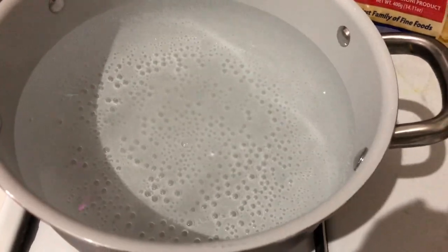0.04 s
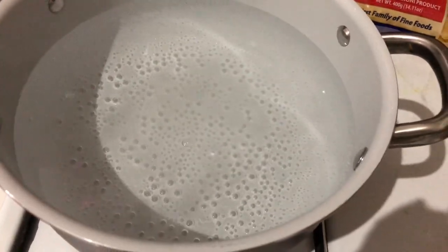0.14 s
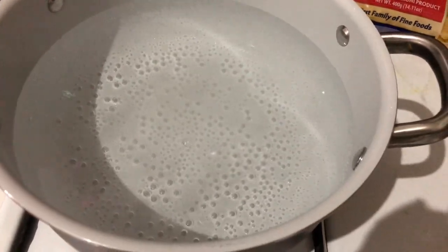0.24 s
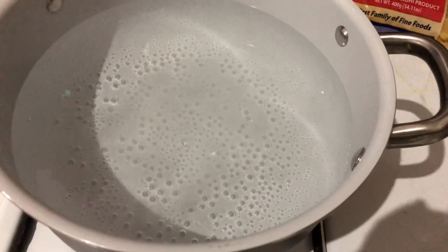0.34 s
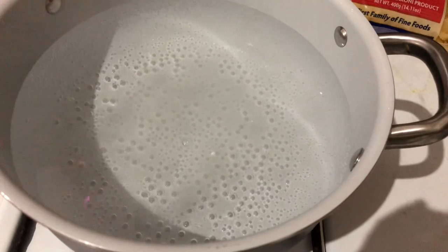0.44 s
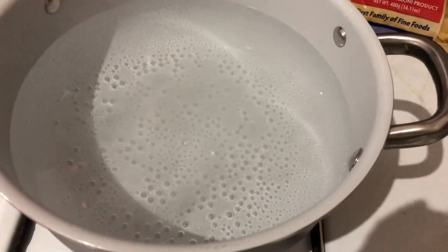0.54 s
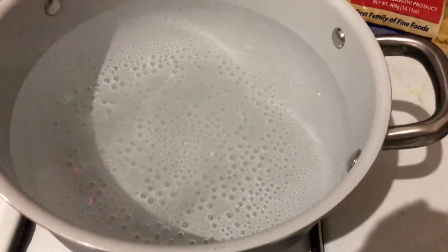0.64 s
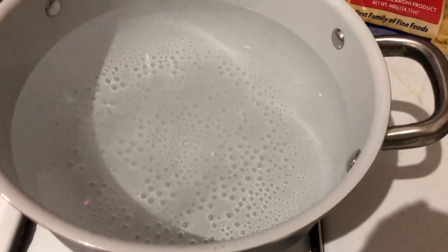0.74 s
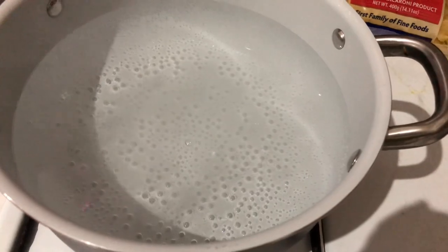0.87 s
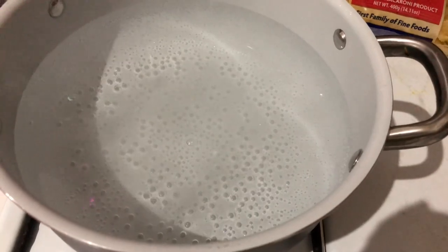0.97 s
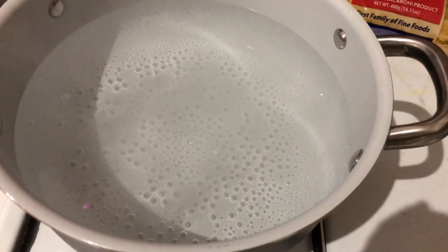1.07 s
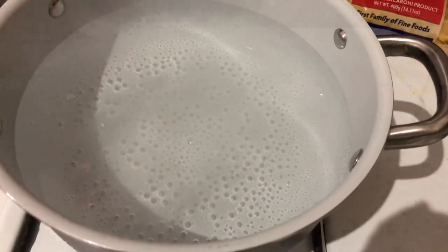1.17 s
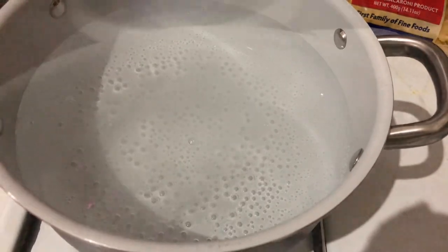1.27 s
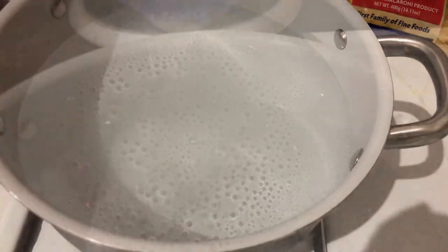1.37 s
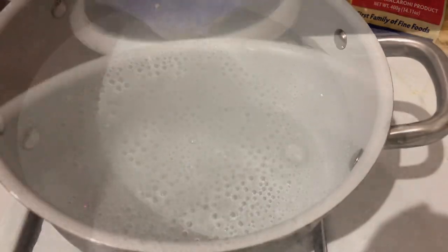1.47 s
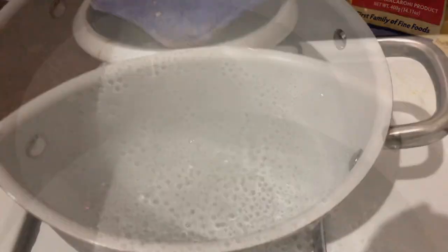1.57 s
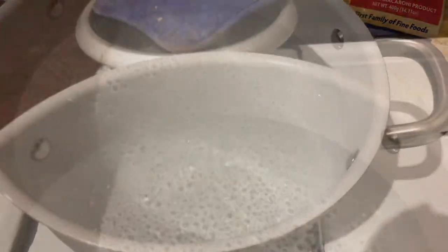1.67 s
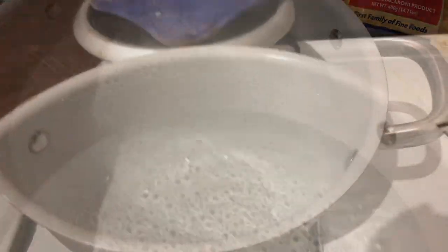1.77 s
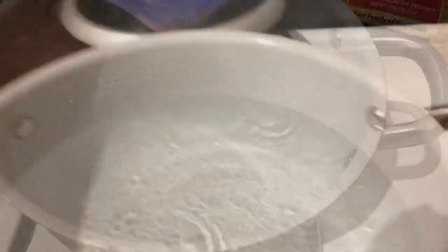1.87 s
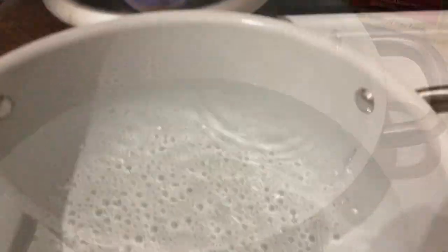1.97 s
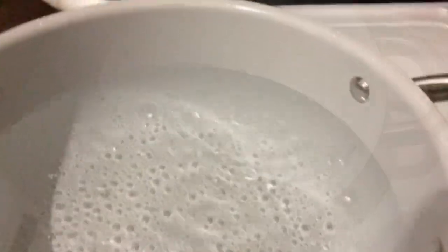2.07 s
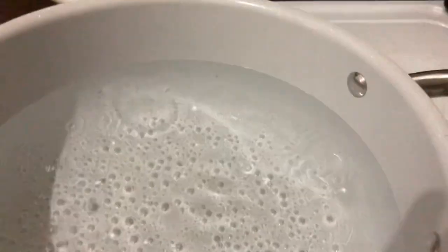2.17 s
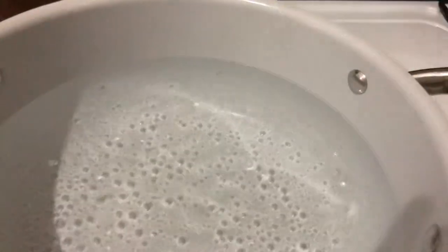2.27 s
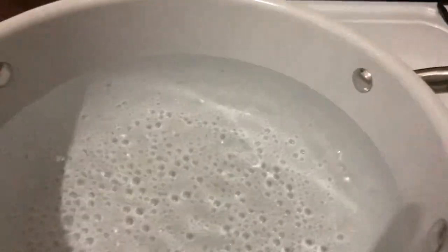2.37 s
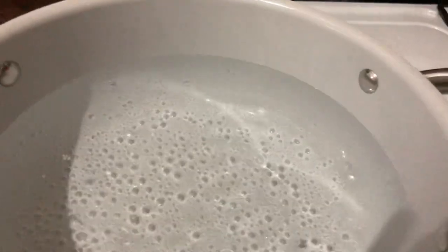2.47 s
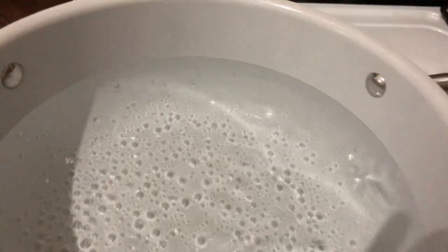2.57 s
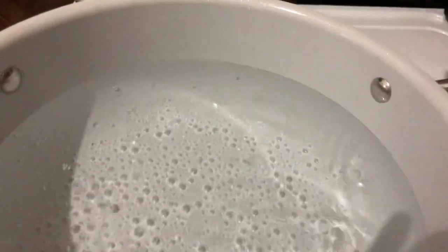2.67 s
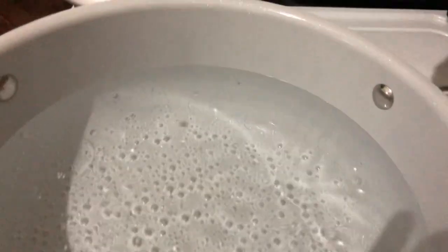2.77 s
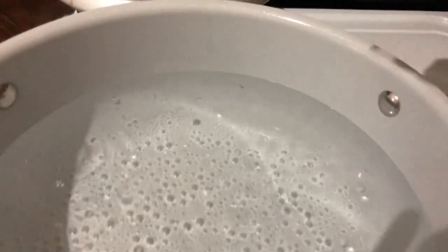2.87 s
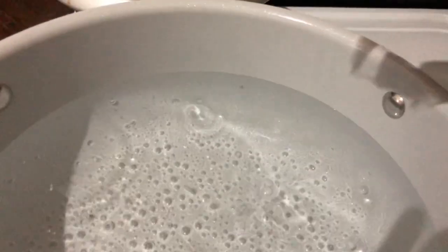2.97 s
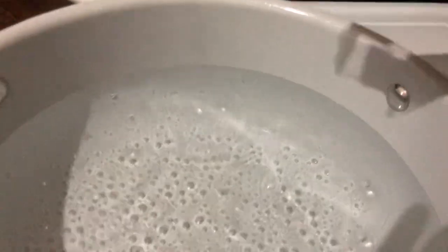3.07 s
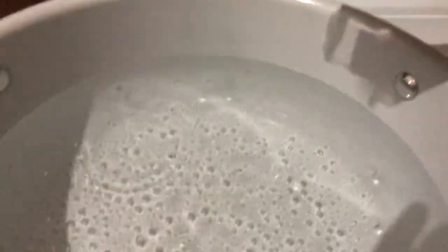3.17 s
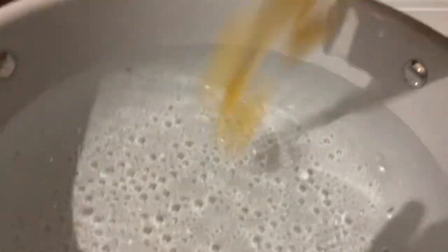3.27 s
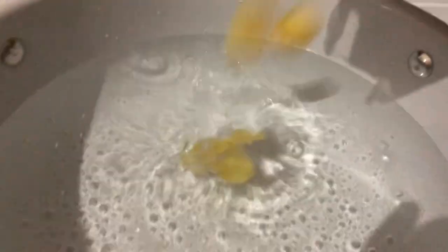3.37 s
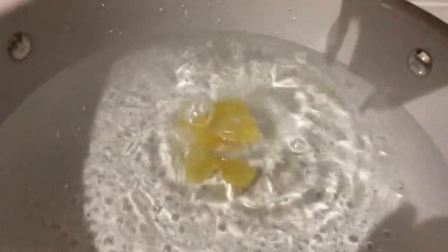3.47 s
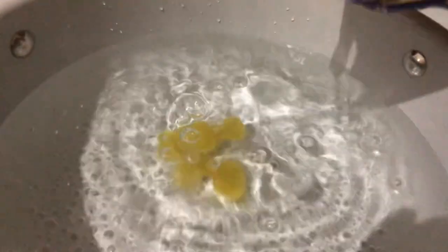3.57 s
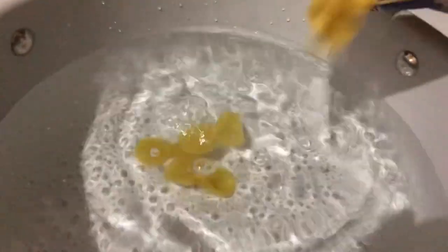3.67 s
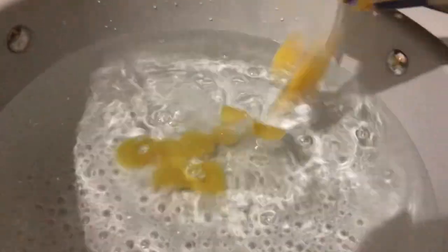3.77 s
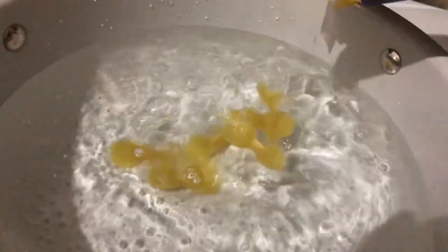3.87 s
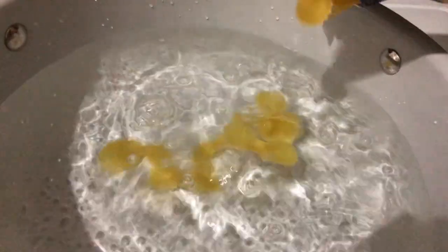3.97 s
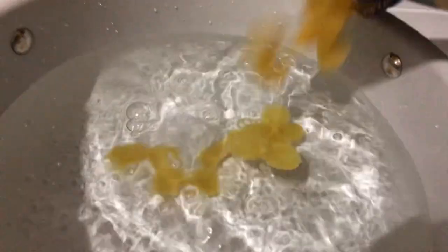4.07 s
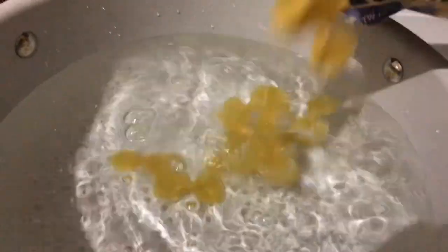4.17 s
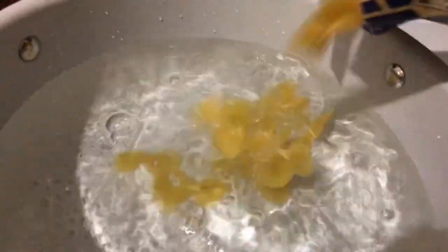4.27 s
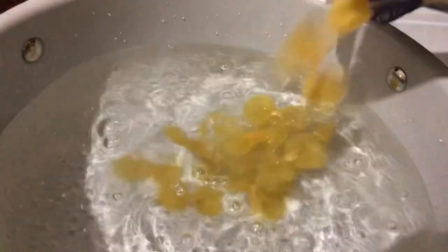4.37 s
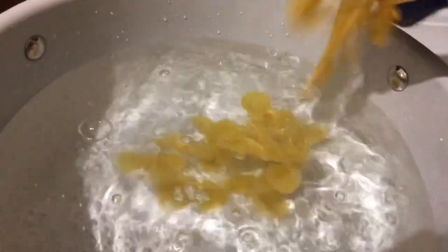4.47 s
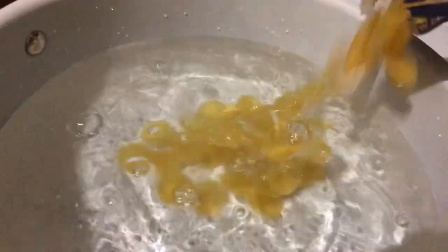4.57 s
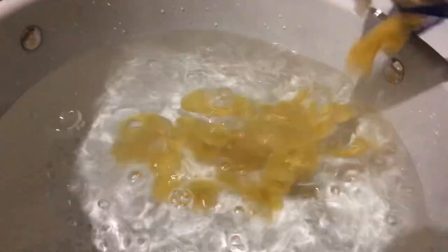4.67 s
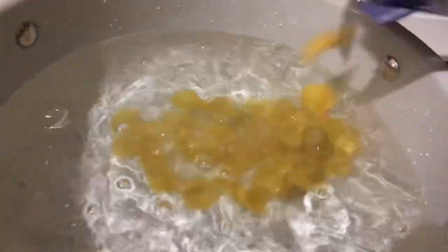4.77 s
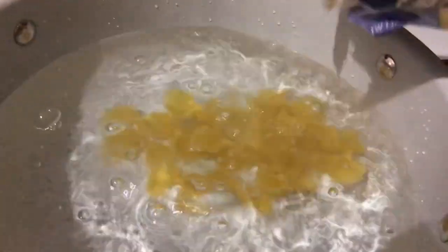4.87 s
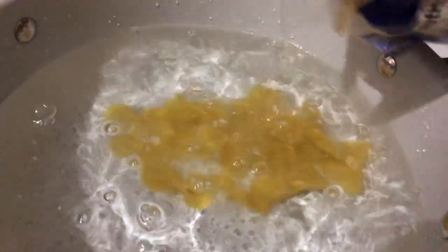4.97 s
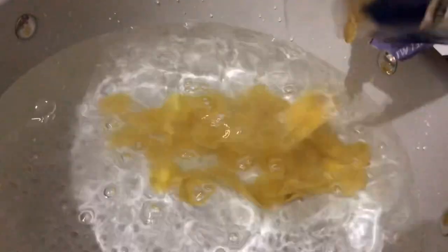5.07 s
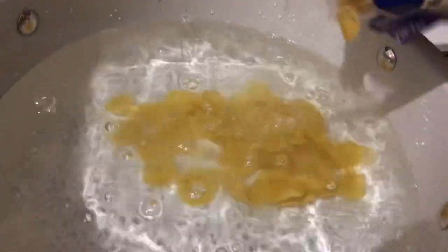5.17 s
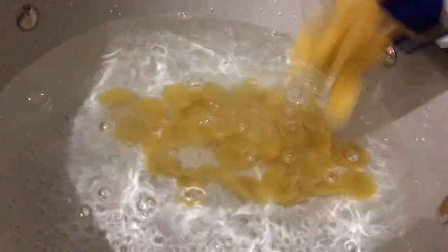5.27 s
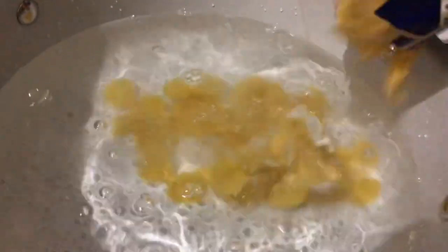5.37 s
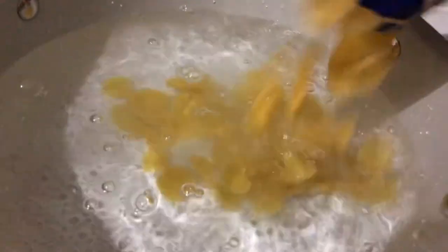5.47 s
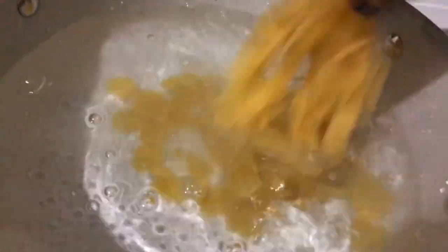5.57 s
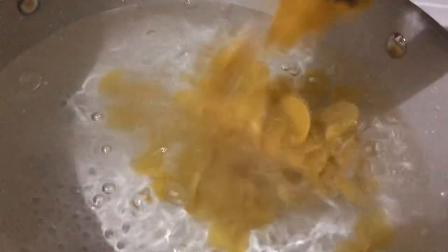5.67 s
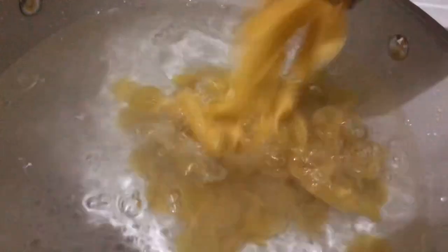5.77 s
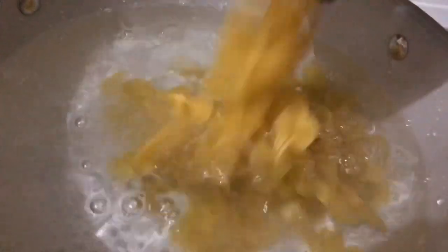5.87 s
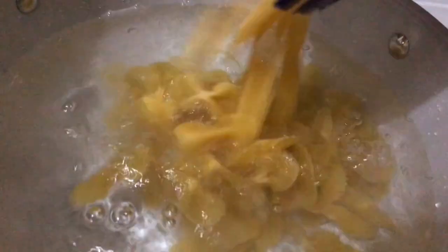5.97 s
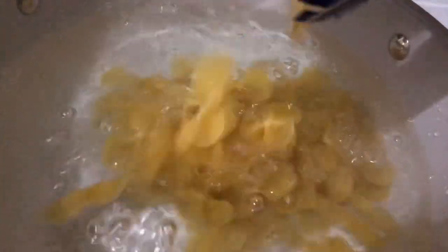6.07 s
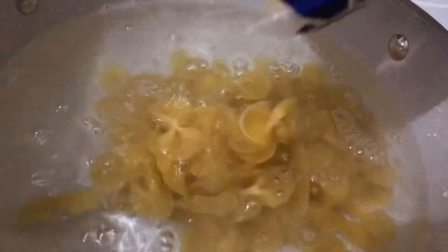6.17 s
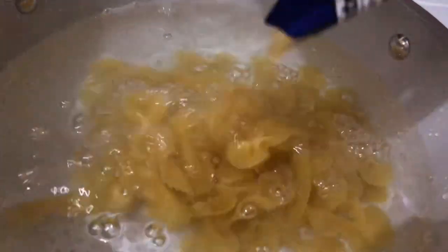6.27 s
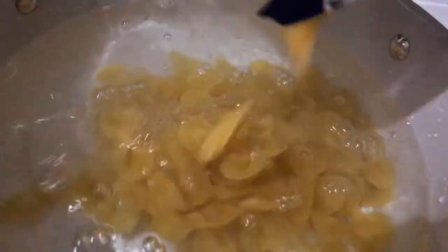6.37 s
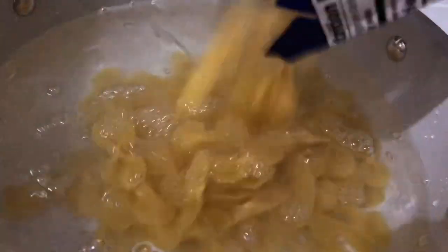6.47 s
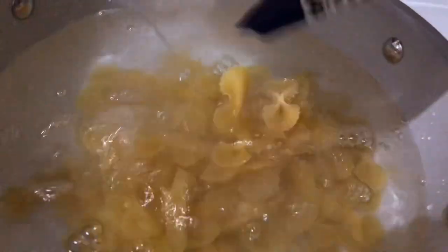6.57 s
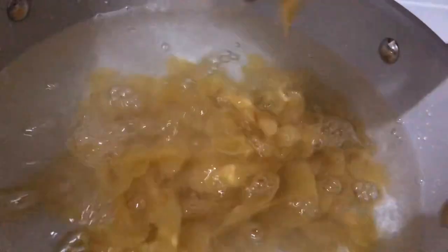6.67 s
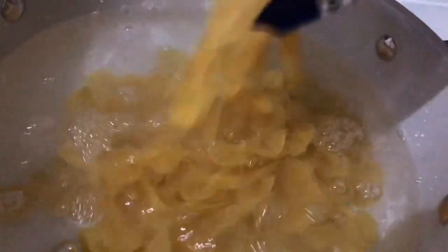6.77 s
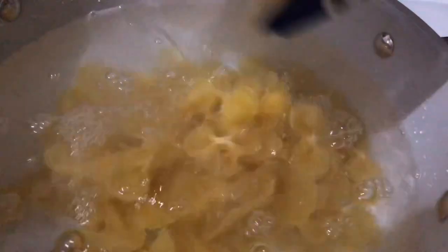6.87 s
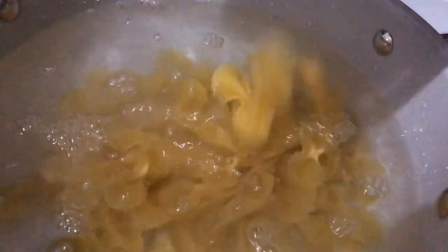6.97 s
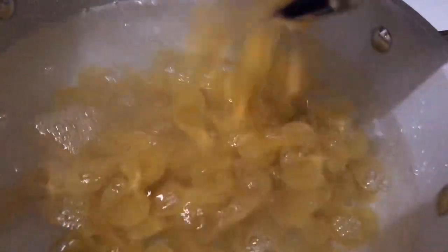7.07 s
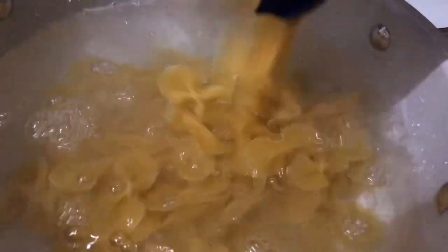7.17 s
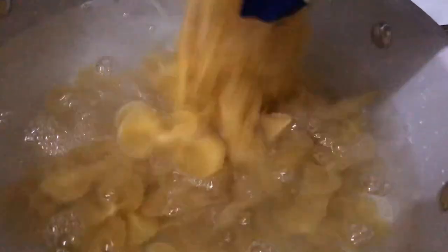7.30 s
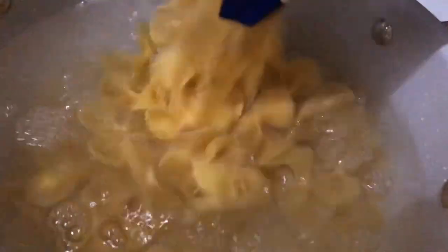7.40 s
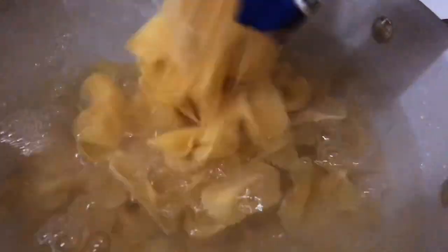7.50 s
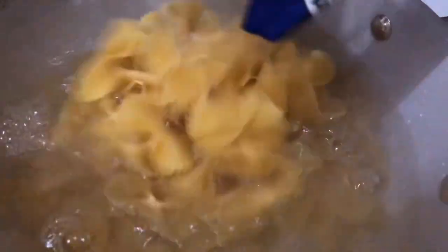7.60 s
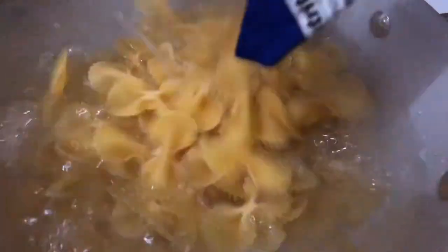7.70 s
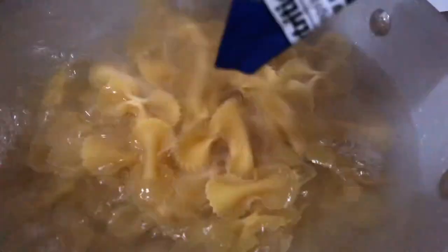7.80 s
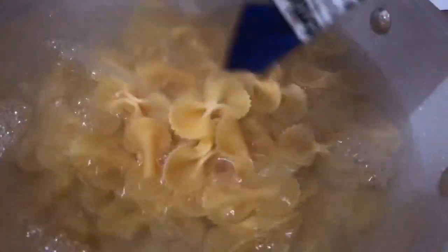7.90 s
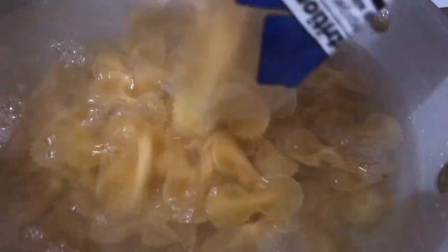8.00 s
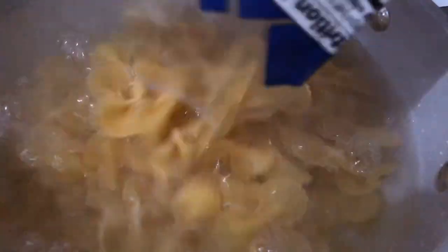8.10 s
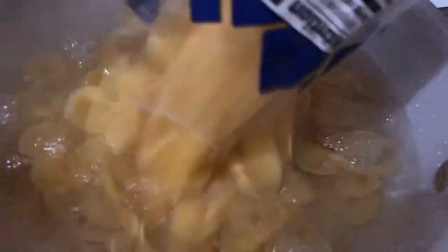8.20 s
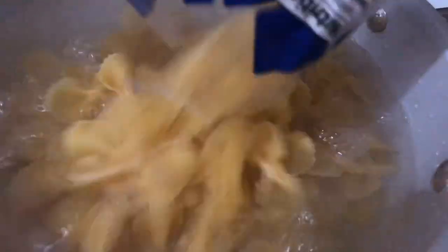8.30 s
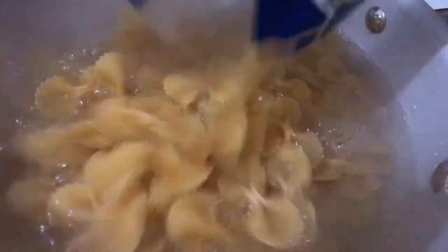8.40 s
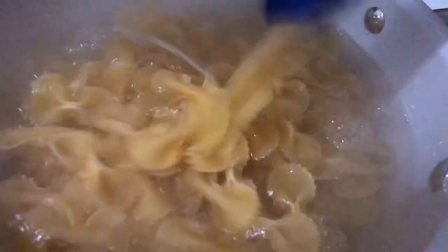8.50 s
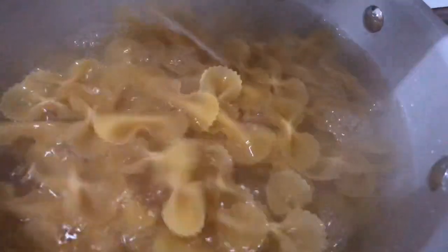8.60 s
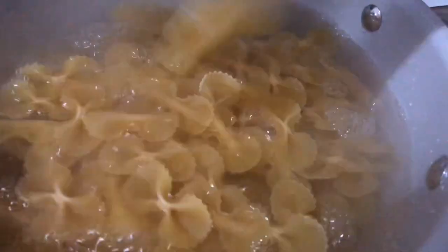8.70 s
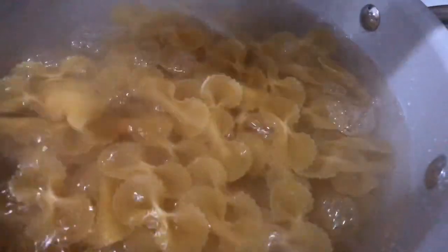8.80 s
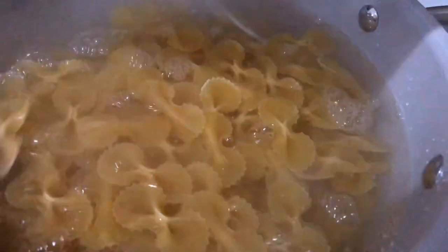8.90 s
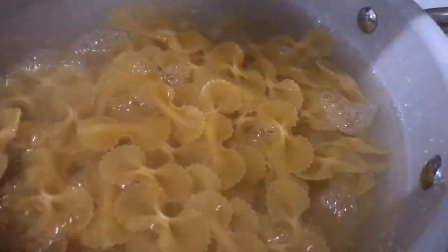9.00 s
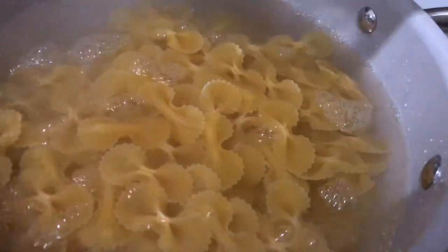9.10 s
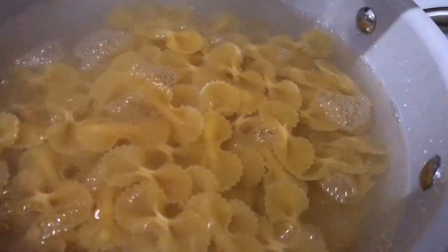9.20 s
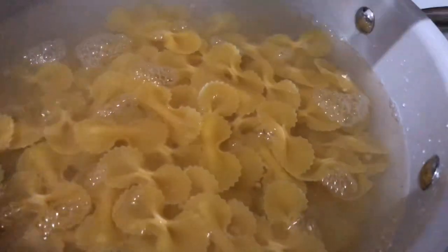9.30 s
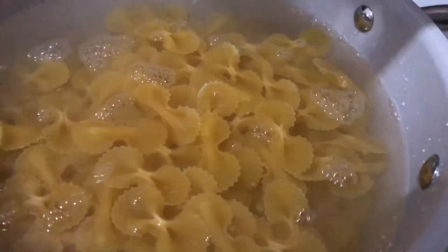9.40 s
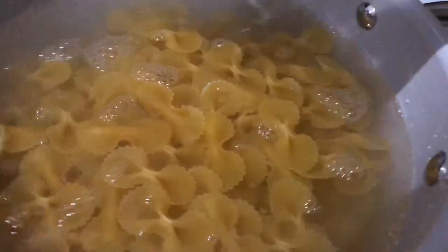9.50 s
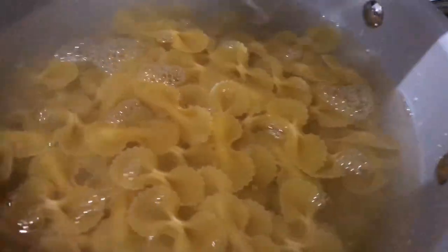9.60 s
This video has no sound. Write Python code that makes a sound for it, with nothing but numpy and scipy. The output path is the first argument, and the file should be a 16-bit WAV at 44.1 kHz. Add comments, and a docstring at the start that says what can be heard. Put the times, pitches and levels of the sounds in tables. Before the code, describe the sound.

A pot murmurs and fizzes while a plastic bag crinkles, then hard dry pasta clatters into the bubbling water in dense, bright surges.

```python
"""A pot murmurs and fizzes throughout; soft low bumps and one sharp snap ring in a small kitchen.
After a faint rustle a plastic bag of dry pasta fades in: its film crinkles, flaps and snaps in creases.
From about 3.4 s the first hard pieces clack and plop into the water, which then bubbles louder.
From 5.5 s the rest clatters out in surges of dense tiny clicks; the empty bag gives a few last crackles."""
import sys
import numpy as np
from scipy import signal
from scipy.fft import rfft, irfft, next_fast_len
from scipy.io import wavfile
from scipy.ndimage import uniform_filter1d, map_coordinates

SR = 44100
rng = np.random.default_rng(int(sys.argv[2]) if len(sys.argv) > 2 else 0)


def output_pcm(signal):
    """Save a mono or channel-first signal as 16-bit PCM at the path in sys.argv[1].

    Samples are clipped to [-1, 1] before scaling.
    """
    pcm = np.clip(np.atleast_2d(signal).T, -1, 1) * 32767
    wavfile.write(sys.argv[1], SR, np.round(pcm).astype(np.int16))


N = 425565


def amp(db):
    """Decibels to gain."""
    return 10 ** (np.asarray(db) / 20)


def unit(x):
    """Scale to rms 1."""
    return x / np.sqrt(np.mean(x ** 2) + 1e-20)


def seconds():
    """Time of every sample of the scene in seconds."""
    return np.arange(N) / SR


def along(points, hz):
    """Read (Hz, value) points on a logarithmic frequency axis."""
    point_hz, value = np.transpose(points)
    return np.interp(np.log(hz + 1), np.log(point_hz + 1), value)


def add(track, s, sound):
    """Mix a sound into a track at time s."""
    part = track[max(round(s * SR), 0):][:len(sound)]
    part += sound[:len(part)]


def coloured(x, gain, size=4096):
    """Filter x with this gain over frequency at minimum phase, so that nothing sounds ahead of time."""
    cepstrum = irfft(np.log(np.maximum(gain(np.fft.rfftfreq(size, 1 / SR)), 1e-6)))
    # folding the cepstrum forward makes the filter causal
    cepstrum[1:size // 2] *= 2
    cepstrum[size // 2 + 1:] = 0
    impulse = irfft(np.exp(rfft(cepstrum)))
    return signal.oaconvolve(x, impulse)[:len(x)]


def bell(hz, centre, width):
    """Gain of one resonance, 1 at its centre."""
    return hz * width / np.hypot(centre ** 2 - hz ** 2, hz * width)


def wobble(rate):
    """A smooth random curve, rate knots a second."""
    knots = rng.standard_normal(int(N * rate / SR) + 4)
    return map_coordinates(knots, [np.arange(N) * rate / SR])


def grains(rate, spread_db):
    """Random moments (samples) at this rate and their sizes, many small and few large, of mean power 1."""
    at = np.flatnonzero(rng.random(N) < rate / SR)
    size = amp(spread_db * (rng.exponential(size=N)[at] % 3))
    # even out the energy over every fifteenth of a second
    power = uniform_filter1d(np.bincount(at, size ** 2, N), SR // 15)
    return at, size / np.sqrt(np.abs(power[at]) + 1e-9)


def pings(at, size, hz, cycles):
    """Every grain is a brief ring of energy size squared that swells for some cycles and dies."""
    longest = int(6 * cycles * SR / np.quantile(hz, .1))
    n = np.arange(longest, dtype=np.float32)
    turns = (hz / SR).astype(np.float32)[:, None] * n
    ring = turns * np.exp(-turns / np.float32(cycles)) * np.sin(2 * np.pi * turns)
    ring *= (size / np.linalg.norm(ring, axis=1))[:, None]
    return np.bincount((at[:, None] + np.arange(len(n))).ravel(), ring.ravel(), N)[:N]


def strokes(rows, attack_s, release_db_per_s, size=64):
    """Power over time of (start s, length s, dB) movements: each swells, holds and dies away."""
    t, power = np.arange(0, N, size) / SR, 1e-12
    for s, length, db in rows:
        swell = np.clip((t - s) / attack_s, 0, 1)
        release_db = release_db_per_s * np.maximum(t - s - length, 0)
        power = power + (swell * amp(db - release_db)) ** 2
    return np.interp(seconds(), t, power)


def effort(rows, attack_s, release_db_per_s):
    """Drive and relative treble (dB over time) of a table of movements."""
    body_rows = [(s, length, db) for s, length, db, _ in rows]
    treble_rows = [(s, length, db + up) for s, length, db, up in rows]
    body = strokes(body_rows, attack_s, release_db_per_s)
    treble = strokes(treble_rows, attack_s, release_db_per_s)
    return 10 * np.log10(body), 10 * np.log10(treble / body)


# Borders of the bands in which each tiny click rings once. Each entry: frequency in Hz.
BAND_EDGES = [400, 900, 1700, 2800, 4800, 7000, 9500, 12500, 16000]
# Lower bands grow only as this power of click size, so hard clicks are brighter.
MELLOW = .75


def crackle(drive, colour, rate, crowding, spread_db, cycles, scatter_db,
            body_db, bright_db, rub_db, uneven_db):
    """Tiny clicks over a soft rub, denser when louder; each rings at a random pitch in every band."""
    level_db, treble_db = drive
    hz = np.arange(SR // 2)
    sounding = level_db > -80
    density = amp(crowding * np.minimum(level_db - level_db.max(), 0))
    at, size = grains(sounding * rate * density, spread_db)

    # the movement sticks and slips
    level_db = level_db + uneven_db * wobble(20)
    body = amp(level_db + body_db) / np.linalg.norm(colour(hz[1000:4500]))
    treble = amp(level_db + treble_db + bright_db) / np.linalg.norm(colour(hz[5500:15000]))

    # surfaces sliding on each other hiss between the clicks
    rub = amp(rub_db) * np.sqrt(SR / 2) * sounding * rng.standard_normal((2, N))

    def upper(f):
        return np.interp(f, BAND_EDGES[3:6], [0, .5, 1])

    out = coloured(rub[0] * body, lambda f: 1 - upper(f)) + coloured(rub[1] * treble, upper)

    # compressed sizes for the lower bands, at the same total energy
    mellow = size ** MELLOW * np.linalg.norm(size) / np.linalg.norm(size ** MELLOW)
    for lo, hi in zip(BAND_EDGES, BAND_EDGES[1:]):
        place, tint, sign, lag = rng.random((len(at), 4)).T
        strength = size * treble[at] if lo >= BAND_EDGES[4] else mellow * body[at]
        gain = strength * np.sqrt(hi - lo) * amp(scatter_db * (2 * tint - 1))
        late = (lag * .0007 * SR).astype(int)  # up to 0.7 ms
        out += pings(at + late, gain * np.sign(sign - .5), lo + (hi - lo) * place, cycles)
    return coloured(out, colour)


# Decay of the kitchen. Each row: frequency in Hz, time to fall 60 dB in seconds.
KITCHEN_DECAY = [(150, 0.34), (1000, 0.7), (2200, 0.72), (5000, 0.42), (9000, 0.27), (15000, 0.08)]


def room(x, early_db, order=8):
    """Near surfaces answer at once, then the kitchen dies away, with the next of a few random tails
    for each tenth of a second."""
    hz, t, z = signal.stft(rng.standard_normal((order, SR * 2 // 3)), SR, nperseg=256)
    decay = amp(-60 * t / along(KITCHEN_DECAY, hz)[:, None])
    tails = signal.istft(z * decay, SR, nperseg=256)[1]
    early = amp(early_db - 60 * np.arange(tails.shape[1]) / SR / 0.022)
    tails *= (1 + early) / np.linalg.norm(tails[0])
    # the tails take turns on a fixed clock
    turn = np.arange(N) // (SR // 10) % order == np.arange(order)[:, None]
    return signal.oaconvolve(x * turn, tails, axes=1).sum(0)[:N]


def low_cut(x):
    """Low cut at 55 Hz: the thuds and bumps hold little deep bass."""
    return coloured(x, lambda hz: hz ** 4 / np.hypot(hz ** 4, 55 ** 4))


# Tone of burner and water. Each row: frequency in Hz, relative level in dB.
SIMMER_TONE = [(25, -12), (80, 7), (380, 4), (750, -4.5), (2100, -8), (7500, -23.5), (9000, -28),
               (16000, -28)]
PASTA_IN_S, FOAM_DB = 3.4, 3.5  # once the pasta is in, the bubbling rises by this much over a second


def simmer():
    """Low noise murmur of the burner and the water, with tiny bubbles bursting as brief pings."""
    at, size = grains(rate=260, spread_db=28.0)
    fizz = pings(at, size, rng.uniform(1500, 9000, len(at)), cycles=3.5)
    foaming = np.clip(seconds() - PASTA_IN_S, 0, 1)
    murmur = coloured(rng.standard_normal(N) + 0.18 * fizz, lambda hz: amp(along(SIMMER_TONE, hz)))
    return amp(-61 + FOAM_DB * foaming) * unit(murmur)


# Dull bumps and low rings; the row at 0.395 s is the low ring after the snap. Each row: start in seconds, level
# in dB before the attack and low cut, # centre pitch in Hz, time to fall 60 dB in seconds.
BUMPS = [(0.004, -37.5, 443, 0.35), (0.164, -40, 321, 0.17), (0.395, -39.5, 407, 0.33),
         (2.311, -18.5, 280, 0.03), (8.0, -24.5, 85, 0.044)]


def bumps():
    """Soft contacts, and the low ring that follows the snap, each a close pair of low rings that beat and waver
    in pitch."""
    out, t = np.zeros(N), np.arange(SR // 4) / SR
    for s, db, hz, t60 in BUMPS:
        turns = np.cumsum(hz * np.exp(0.09 * wobble(90)[:len(t)])) / SR
        pair = np.sin(2 * np.pi * turns) * np.cos(2 * np.pi * turns * 0.053)
        add(out, s, amp(db - 60 * t / t60) * (1 - np.exp(-t / 0.00085)) * pair)
    return out


# Movements of the bag, in four tables. Each row: start in seconds, length in seconds,
# drive in dB before the trims in bag(), treble in dB relative to the drive.
# A faint rustle ahead of the first squeeze.
BRUSHES = [(.228, 0.025, -57, -15.5)]
# The hand squeezes and tips the full bag.
SQUEEZES = [(1.191, 0.59, -40.5, -3.5), (1.834, 0.054, -34.5, -2), (1.941, 0.2, -37, -3),
            (2.138, 0.42, -34.5, -1.5), (2.597, 0.21, -43, -5), (3.123, 0.11, -46, 2),
            (3.512, 0.097, -43, -2), (3.649, 0.094, -36, -1), (3.804, 0.042, -36, -6),
            (3.961, 0.22, -45, 3.5), (4.296, 0.0794, -44, -7.5), (4.451, .08, -40, -2.5),
            (4.659, 0.17, -36, -4.5), (4.9, 0.23, -42, -2), (5.117, 0.32, -34, -3.5)]
# Under the squeezes the held bag keeps rustling.
HOLDING = [(1.285, 2.01, -51, -4), (3.307, 5.296, -47.5, -0.5)]
# The empty bag is lifted away.
LIFTS = [(8.62, 0.525, -51, -5.5), (9.413, 0.077, -56, -7), (9.539, 0.11, -47, -9)]


def handle_bag():
    """The hand's movements swell and die away as drive and treble over time."""
    return effort(BRUSHES + SQUEEZES + HOLDING + LIFTS, attack_s=.035, release_db_per_s=130)


# Tone of the film. Each row: frequency in Hz, relative level in dB per Hz.
FILM_TONE = [(250, -33), (420, -13.5), (700, -9.5), (1300, -7.5), (2050, 0.5), (3200, -8.5), (5200, -9),
             (7500, -3), (9000, -13.5), (15800, -16.5)]
# Tone added while the film is stretched taut. Each row: frequency in Hz, level in dB on top of FILM_TONE.
TAUT_TONE = [(700, -3.5), (2100, -2.5), (3000, 1.5), (4500, 0), (8000, -4)]
SLACKENS_S = 3.07  # middle of the one-second fade from taut to slack


def film_gain(hz):
    """Gain of the plastic film over frequency."""
    return amp(along(FILM_TONE, hz))


def bag(squeezing):
    """Creases in the film buckle one after another; until it is tipped the taut film rings higher."""
    crinkle = crackle(squeezing, film_gain, rate=760, crowding=.6, spread_db=7.0, cycles=1.17,
                      scatter_db=6.5, body_db=-4.5, bright_db=-5.0, rub_db=-8, uneven_db=1.26)
    taut = np.clip(SLACKENS_S + .5 - seconds(), 0, 1)
    stretched = coloured(crinkle, lambda hz: amp(along(TAUT_TONE, hz)))
    return taut * stretched + (1 - taut) * crinkle


# Tone of the snap. Each row: frequency in Hz, relative level in dB.
SNAP_TONE = [(120, -23), (330, -11.5), (750, -23), (1300, -8), (3800, -7), (7000, -5.5), (9000, -15),
             (16000, -28)]


def snap():
    """One sharp snap further off, followed by much of the room, which is duller than the snap itself."""
    blow = np.zeros(N)
    add(blow, .382, amp([6.5]))  # a single-sample impulse
    crack = coloured(blow, lambda hz: amp(along(SNAP_TONE, hz)))
    dulled = coloured(crack, lambda hz: 1 / np.hypot(1, hz / 7500))
    return crack + amp(2.5) * room(dulled, early_db=15.0)


def fade_in():
    """Gain over time: from the first squeeze on, the bag's sound fades in over 0.3 s."""
    since_s = seconds() - SQUEEZES[0][0]
    return np.where(since_s < 0, 1, np.clip(since_s / 0.3, 0, 1))


# Middle pitch of the thuds of the bag's walls. Each row: time in seconds, pitch in Hz.
THUD_PITCH = [(1.5, 414), (5.0, 307), (8.2, 177), (8.9, 348)]
# Shakes shift the load and make the walls flap harder. Each row: start in seconds, length in seconds,
# level in dB.
SHAKES = [(4.76, 0.058, -44), (5.14, 0.32, -47), (6.65, 0.54, -46), (7.07, 0.47, -45.5), (7.97, 0.31, -43)]
# wall level when the handling is at FIRM_DB, its growth in dB per dB, and its lead on the crinkle
FLEX_DB, FIRM_DB, FLEX_GROWS, FLEX_LEAD_S = -46.5, -35, 0.55, 0.02


def flex(handling_db):
    """The bag's walls flap in soft thuds that deepen as it empties and slackens, then rise at the end."""
    t = seconds()
    ahead_db = np.interp(t + FLEX_LEAD_S, t, handling_db)
    walls = amp(FLEX_DB + FLEX_GROWS * (ahead_db - FIRM_DB))
    shaking = strokes(SHAKES, attack_s=0.018, release_db_per_s=133)
    strength = np.sqrt(walls ** 2 + shaking)
    at, size = grains(480 * (t > SQUEEZES[0][0]), spread_db=3.0)
    pitch_hz = np.interp(at / SR, *np.transpose(THUD_PITCH))
    hz = pitch_hz * np.exp(0.47 * rng.standard_normal(len(at)))
    return pings(at, size * strength[at], hz, cycles=0.56)


def clicks(rows, width, attack_s, crack_s, film_db):
    """Each loud click is a bright crack with its own ring; the bag's film sounds on a moment longer."""
    out, t = np.zeros(N), np.arange(SR // 20) / SR
    for s, db, ring_hz in rows:
        def tint(hz):
            ring = bell(hz, ring_hz, width * ring_hz)
            return amp(along(FILM_TONE, hz) / 2) * (0.09 * hz / (hz + 1500) + ring)

        crack = coloured(amp(-60 * t / crack_s) * rng.standard_normal(len(t)), tint)
        film = coloured(amp(-60 * t / 0.038) * rng.standard_normal(len(t)), film_gain)
        click = (unit(crack) + amp(film_db) * unit(film)) * (1 - np.exp(-t / attack_s))
        add(out, s, amp(db) * click / np.abs(click).max())
    return out


# Single creases snapping. Each row: start in seconds, dry peak in dB, ring in Hz.
CREASES = [(1.872, -17, 1740), (2.0585, -12, 3360), (2.164, -11.5, 3400), (2.354, -13.5, 2280),
           (2.4223, -20, 2168), (2.4675, -14, 2350), (2.5175, -15.5, 2585), (2.7006, -21, 2423),
           (2.9622, -22, 2170), (3.0701, -16.5, 1753), (3.4675, -20.5, 1306), (3.959, -27, 2275),
           (4.0405, -20.5, 1873), (4.185, -23.5, 1929), (4.459, -21, 2363), (4.696, -13.5, 1960),
           (4.7206, -21.5, 1904), (4.8005, -22, 3890), (4.841, -23, 1936), (4.994, -23, 1962),
           (5.026, -19.5, 2368), (5.093, -18.5, 2047), (5.721, -11, 3990), (6.0276, -20, 2085),
           (6.182, -21, 3797), (6.2012, -21.5, 2100), (6.286, -22.5, 2160), (6.378, -18, 2040),
           (8.782, -20, 5712), (8.9326, -28, 1647), (9.4005, -33.5, 1571), (9.5329, -22, 1740),
           (9.5856, -24.5, 1835)]


def snapping_creases():
    """A crease in the film flips over with a very short, sharp crack."""
    return clicks(CREASES, width=0.2, attack_s=0.00017, crack_s=0.0046, film_db=-5.5)


# Single hard pieces clacking. Each row: start in seconds, dry peak in dB.
CLACKS = [(3.3433, -20.5), (3.3693, -15.5), (4.171, -23), (4.3072, -7.5), (4.5793, -5), (5.743, -9.5),
          (5.798, -12.5), (5.899, -10.5), (5.969, -13.5), (6.081, -14.5), (6.127, -15.5), (6.781, -11),
          (6.8581, -7), (7.156, -12.5), (7.2167, -12), (7.358, -10), (7.4093, -11), (7.493, -10),
          (7.612, -10), (7.6581, -7.5), (7.697, -10), (7.823, -12), (8.006, -9.5), (8.0934, -7.5),
          (8.107, -9), (8.26, -9), (8.464, -5.5), (8.56, -10), (8.6169, -17.5), (8.831, -17)]
CLACK_HZ, CLACK_SCATTER = 7000, 0.06  # ring of a piece, and its relative spread from piece to piece


def clacking_pieces():
    """A hard piece knocks and rings high, each piece at a slightly different pitch."""
    pieces = [(s, db, CLACK_HZ * np.exp(CLACK_SCATTER * rng.standard_normal())) for s, db in CLACKS]
    return clicks(pieces, width=0.24, attack_s=0.00056, crack_s=0.0077, film_db=-12.0)


# Short hollow pops as pasta tips out and enters the water. Each row: start in seconds,
# level in dB before make-up gain and attack, starting pitch in Hz.
PLOPS = [(3.384, -31.5, 715), (4.477, -24.5, 1220), (4.907, -26, 526.3), (8.63, -26, 1390)]


def plops():
    """A pocket of trapped air rings briefly, rising a little in pitch."""
    out, t = np.zeros(N), np.arange(SR // 10) / SR
    for s, db, hz in PLOPS:
        envelope = amp(db + 8.5 - 60 * t / 0.0077) * (1 - np.exp(-t / 0.00068))
        add(out, s, envelope * np.sin(2 * np.pi * hz * t * (1 + 8.9 * t)))
    return out


# The pasta slides out in surges. Each row: start in seconds, length in seconds,
# drive in dB before the trims in pasta(), treble in dB relative to the drive.
SURGES = [(5.51, 0.46, -34.5, 1.9), (6.02, 0.06, -35, 2.5), (6.37, .23, -40, -0.5), (6.67, 0.37, -41, 0),
          (6.96, 0.067, -36.5, 4.5), (7.08, 0.23, -34, 2.5), (7.3, .13, -29.5, 4.5), (7.48, 0.15, -31, 6.5),
          (7.68, 0.073, -34, 5.5), (7.81, 0.041, -37, 5.5), (7.99, 0.042, -37.5, 8), (8.035, 0.1, -33, 5),
          (8.195, 0.18, -31.5, 7), (8.41, 0.12, -37.5, 9.5)]


def pour():
    """The sliding load swells and dies away as drive and treble over time."""
    return effort(SURGES, attack_s=.03, release_db_per_s=170.5)


# Tone of the rattle. Each row: frequency in Hz, relative level in dB per Hz.
PASTA_TONE = [(400, -23), (780, -11), (1400, -8), (2700, -9), (4800, -11), (6400, -7.5), (7400, -0.5),
              (8600, -3), (10800, -12), (12600, -8), (15800, -15)]
# Hollow of the bag's mouth and the pot. Each row: resonance in Hz, width in Hz, level in dB before make-up.
HOLLOW = [(754.5, 80, -5), (955, 41, -6.5), (1220, 340, -9.5), (2060, 314, -5), (3820, 300, -2)]


def pasta(pouring):
    """Hard pieces tumble over each other and ring the hollow that they fall through."""
    def colour(hz):
        hollow = sum((amp(db + 21.5) * bell(hz, centre, width)) ** 2 for centre, width, db in HOLLOW)
        return amp(along(PASTA_TONE, hz)) * np.sqrt(1 + hollow)

    return crackle(pouring, colour, rate=1400, crowding=.7, spread_db=5.0, cycles=2.03,
                   scatter_db=9.0, body_db=-5.5, bright_db=-5.0, rub_db=-8, uneven_db=0.66)


def scene():
    """Bag, pasta and water close by, in the kitchen."""
    squeezing, pouring = handle_bag(), pour()
    handling_db = np.maximum(squeezing[0], pouring[0])
    film = fade_in() * bag(squeezing) + snapping_creases()
    thuds = low_cut(fade_in() ** 2 * flex(handling_db) + bumps())
    near = film + thuds + pasta(pouring) + plops()
    clacks = clacking_pieces()
    reverb = amp(-9.5) * room(near + amp(-5.0) * clacks, early_db=12.5)
    return (near + clacks + reverb + snap() + simmer())[None]


def record(dry):
    """The recorder keeps nothing above its band limit of 15850 Hz."""
    size = next_fast_len(N + SR // 2)
    passed = np.fft.rfftfreq(size, 1 / SR) < 15850
    return irfft(rfft(dry, size) * passed, size)[:, :N]


dry = scene()
out = record(dry)
output_pcm(out)
```